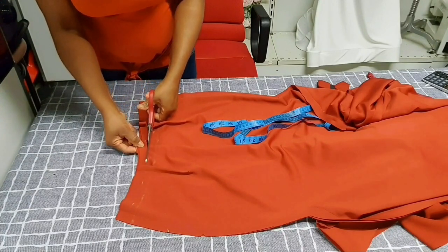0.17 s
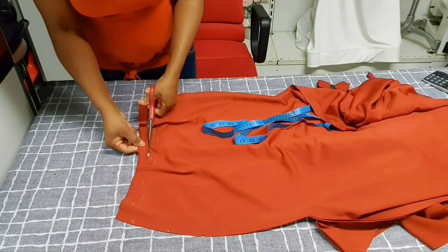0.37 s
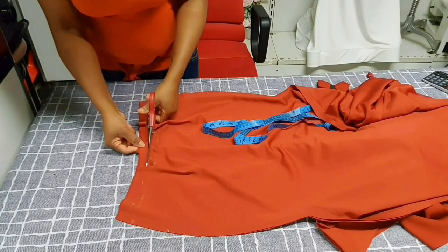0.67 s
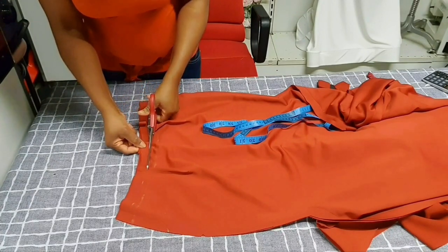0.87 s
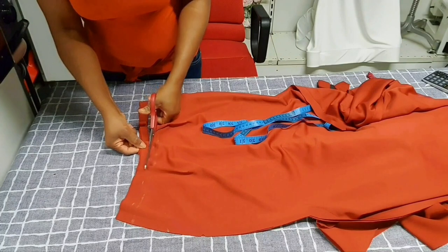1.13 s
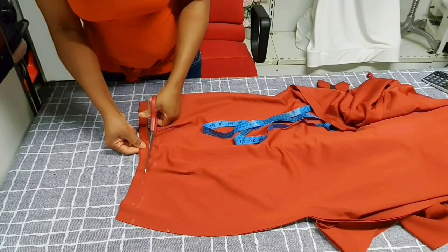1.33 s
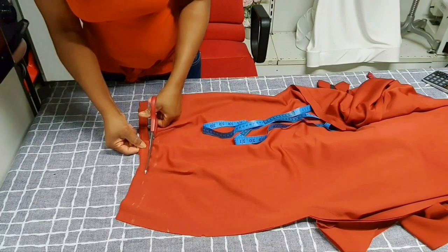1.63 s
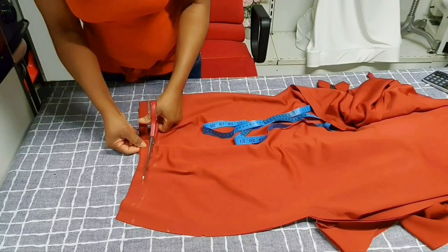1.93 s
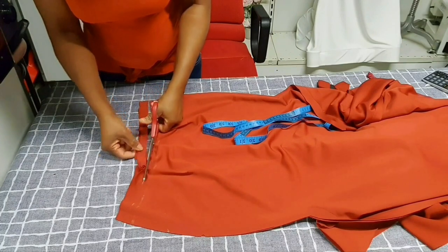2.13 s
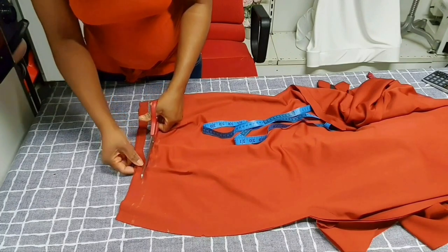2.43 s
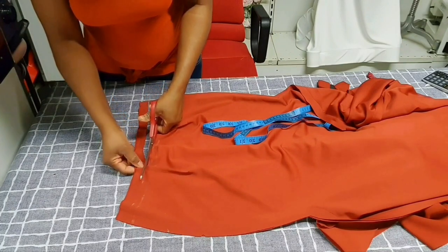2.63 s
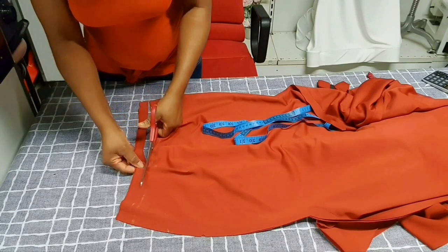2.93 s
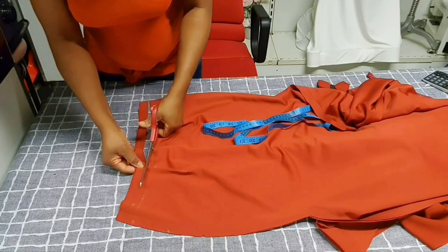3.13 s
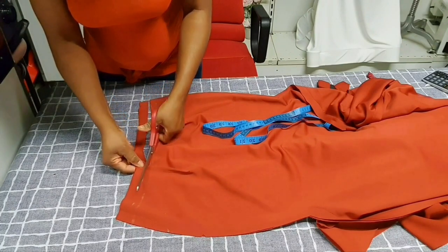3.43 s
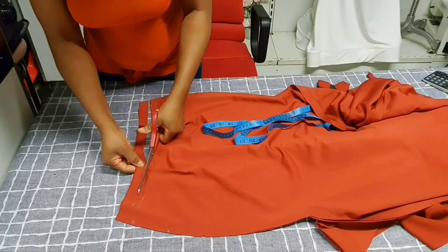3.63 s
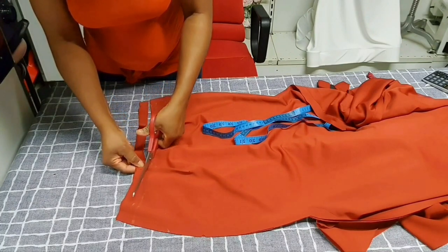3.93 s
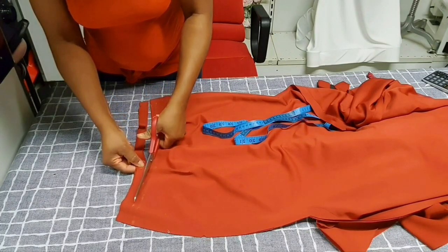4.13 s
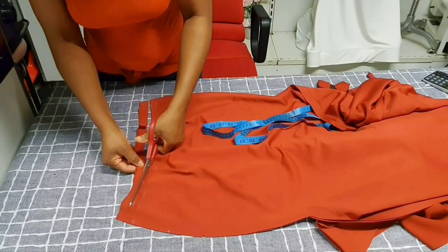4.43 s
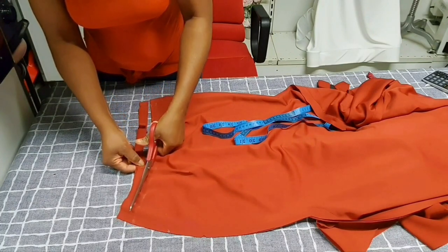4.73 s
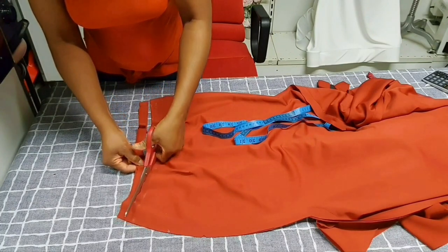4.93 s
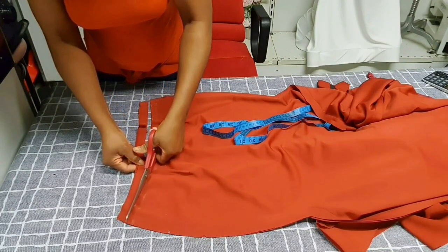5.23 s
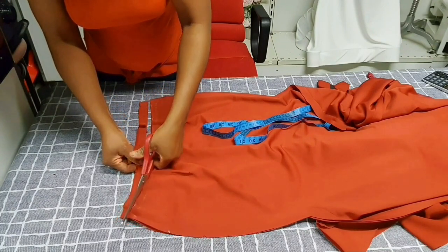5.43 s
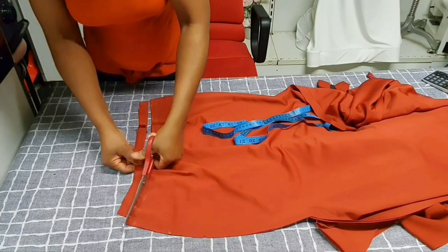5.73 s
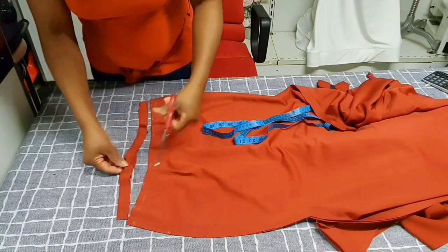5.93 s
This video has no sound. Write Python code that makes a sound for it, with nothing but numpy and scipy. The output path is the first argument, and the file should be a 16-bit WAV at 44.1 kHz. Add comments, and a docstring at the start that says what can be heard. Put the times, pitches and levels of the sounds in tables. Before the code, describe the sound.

Close by, slightly left, scissors trim cloth on a covered table. Nine short crunchy snips come about a second apart at first, then every half second, growing fuller. Each brings a dull table knock and often a small bright steel tick. Cloth swishes softly between early cuts, and blades rub dully as they reopen. Small quiet room with a faint low hum that sinks and fades.

```python
"""Tailor's scissors at a cloth-covered table

Scissors trim a strip from a dress in a small room. In each snip the lower blade settles on the table,
the blades bite, and parting threads, as uneven stick-slip impulses, shake the table and the steel.
Between snips the blades open and slide on, and the cloth swishes as shaped noise.
Knocks ring the table's modes, and steel ticks are short bright bursts of noise.
Behind lie quiet air and a faint, wavering low sine hum that sinks in pitch and fades to a fainter level."""
import sys
import numpy as np
from scipy import signal
from scipy.fft import rfft, irfft
from scipy.io import wavfile
from scipy.ndimage import uniform_filter1d

SR = 44100
rng = np.random.default_rng(int(sys.argv[2]) if len(sys.argv) > 2 else 0)


def dump_mix(stems):
    """Bounce the given channels to the path in sys.argv[1] as a 16-bit WAV at rate SR."""
    frames = np.atleast_2d(stems).T  # one column per channel
    limited = np.clip(frames, -1, 1)  # hard clip at full scale
    pcm = np.round(limited * 32767).astype(np.int16)
    wavfile.write(sys.argv[1], SR, pcm)


N = 268569
T = np.arange(N) / SR  # seconds

# All levels in the tables are relative, ahead of the trims in the functions.
# The snips. Each row: bite in seconds, length in seconds, landing ahead of the bite in seconds,
# landing level in dB, push on the table in dB, crunch of threads in dB, shear of the blades in dB,
# rasp of the edges in dB, fizz of fibres in dB, growth of the grip over the stroke in dB.
SNIPS = [(0.379, 0.0785, 0.036, -63, -47.5, -45.5, -46.5, -65, -67.5, 12.5),
         (1.383, 0.0759, 0.0315, -50, -44.5, -51.5, -60, -76.5, -74.5, 17),
         (1.981, 0.11415, 0.0151, -49, -37.5, -40.5, -54.5, -61.5, -68, -6),
         (2.526, 0.0907, 0.0248, -44, -49.5, -45.5, -50.5, -70.5, -64.5, 9.5),
         (3.522, 0.0801, 0.045, -43, -50.5, -44, -46.5, -65.5, -66, 6),
         (4.094, 0.0659, 0.0485, -46.5, -46.5, -42, -46, -57.5, -64, 5.5),
         (4.633, 0.1416, 0.0086, -72, -35, -38.5, -52.5, -54.5, -71, 2),
         (5.149, 0.1055, 0.033, -42, -34, -34.5, -51.5, -53, -68, 1.5),
         (5.676, 0.0906, .034, -53.5, -35.5, -37, -50.5, -50.5, -67.5, 3)]
# The blades open. Each row: start in seconds, length in seconds, rub on the table in dB,
# rub in the pivot in dB.
OPENINGS = [(2.265, 0.059, -54.5, -68), (3.231, 0.0916, -59.5, -79.5), (3.817, 0.0802, -58.5, -65.5),
            (4.424, 0.0285, -55, -56.5), (4.885, 0.1013, -58, -59.5), (5.379, 0.0978, -59.5, -61.5),
            (5.928, 0.0853, -59.5, -61.5)]
# The scissors knock on the table. Each row: time in seconds, strength in dB,
# hardness as a top cut-off in Hz, lightness as a bottom cut-off in Hz.
KNOCKS = [(.096, -27.5, 374, 163), (.125, -38, 669, 280), (.469, -18, 1466, 130), (.476, -24.5, 1175, 548),
          (.648, -28, 385, 152), (0.677, -34.5, 600, 139), (1.134, -50, 658, 400), (1.433, -30, 711, 198),
          (1.486, -20, 1418, 70), (1.746, -35, 678, 130), (2.014, -27.5, 850, 275), (2.047, -21, 860, 263),
          (2.53, -35, 850.7, 454), (2.593, -25.5, 930, 550), (2.617, -21, 814, 224), (2.645, -30, 195, 50),
          (2.951, -27.5, 371.7, 93), (2.976, -40.5, 600.3, 248), (3.586, -16.5, 1836, 85),
          (3.843, -37.5, 611, 298), (4.175, -26, 940, 117), (4.41, -40.5, 315, 109), (4.644, -25, 900, 330),
          (4.678, -21, 799.2, 400), (4.752, -22, 1123, 242), (5.202, -23, 301, 90), (5.231, -17, 950, 403),
          (5.721, -23, 508, 80.3), (5.735, -22.5, 643, 447), (5.757, -26.5, 976, 97)]
# Steel ticks on steel. Each row: time in seconds, level in dB.
TICKS = [(0.0941, -51), (0.4295, -61), (.47, -48), (.648, -63), (0.6785, -60.5), (1.364, -66),
         (1.4315, -62), (1.484, -47), (1.746, -49), (2.5907, -47.5), (2.6182, -45.5), (2.8529, -72.5),
         (3.5848, -51), (4.172, -46.5), (4.7533, -46.5), (5.263, -40.5), (5.72, -58), (5.7553, -42)]
# The cloth is drawn along. Each row: time of the height in seconds, swelling in seconds,
# fading in seconds, brushing level in dB, silky hiss in dB.
SWISHES = [(1.03, 0.0837, 0.114, -59.5, -67.5), (1.193, 0.1243, 0.147, -57, -65.5),
           (1.85, 0.31, 0.45, -78.5, -79.5), (2.83, 0.313, 0.176, -78, -69),
           (2.882, 0.0795, 0.055, -88.5, -56), (2.965, 0.108, 0.118, -67, -73.5),
           (3.08, .08, .12, -92.5, -80.5), (3.644, .06, 0.0935, -50, -76)]

# Ringing modes of the table top. Each row: pitch in Hz, level in dB, decay by 60 dB in seconds.
TABLE_MODES = [(90.9, -13.5, 0.42), (130.01, 5, 0.2593), (166.57, -1.5, 0.17), (191.9, -15, 0.27),
               (264.47, 2.5, 0.2073), (292.1, 0.5, 0.14), (341.2, -3.5, 0.089), (379.96, -8.5, 0.13),
               (478.36, -11, 0.1), (522.77, -6, 0.1116), (612.74, -14.5, 0.075), (748.6, -7.5, 0.131),
               (856.4, -14, 0.034), (865.7, -13.5, 0.14), (952.7, -14.5, 0.063), (1026.2, -7.5, 0.1893),
               (1065.6, -9.5, 0.071), (1246, -12, 0.052), (1285, -22, 0.11), (1329.2, -10, 0.065),
               (1428, -18.5, 0.083), (1533, -29, 0.068), (1853, -24.5, 0.17), (2262, -19, .11),
               (2650, -20.5, .1), (3430, -18, 0.11)]
# Pitches at which the table's modes cancel. Each row: pitch in Hz, width in Hz.
DEAD_PITCHES = [(228, 41), (408, 52), (555, 46), (678, 60)]
# Modes of the steel blades. Each row: pitch in Hz, width in Hz, level in dB.
BLADE_MODES = [(2093, 180, -1.5), (3255.3, 67, 5.5), (4255, 1100, -3.5)]

# Colours of the sounds. Each row: frequency in Hz, level in dB.
THUD_COLOUR = [(30, -52.5), (55, -22.5), (85, -2.5), (160, 2.5), (330, -2.5), (480, -2), (1000, -6),
               (1700, -15.5), (3000, -23), (4500, -43), (15000, -47.5)]  # dead thud of the table
CLACK_COLOUR = [(60, -19), (130, 6), (300, 6.5), (520, -15.5), (1050, 0), (1600, -7), (2300, 3.5),
                (3300, -10.5), (6000, -23)]  # straight from the point of contact
PUSH_COLOUR = [(25, -43.5), (55, -11.5), (85, -3.5), (130, -11.5), (175, 5), (270, 0.5), (360, -6.5),
               (480, -14.5), (1000, -37)]  # pressure on the table
CRUNCH_COLOUR = [(150, -28.5), (330, -9.5), (470, 3), (750, -4), (1000, -4.5), (1350, -6.5), (2200, -10),
                 (3500, -17), (8000, -19)]  # parting threads
SHEAR_COLOUR = [(600, -1.5), (1400, 1), (2200, -6.5), (2800, -1.5), (3350, 4.5), (3900, 1), (4600, -12.5),
                (6000, -13.5), (9000, -28), (15500, -40)]  # blade on blade
RASP_COLOUR = [(2500, -24), (4400, 0), (5400, 7), (6700, 3), (7700, 5.5), (8600, -16.5), (9500, -29.5),
               (15600, -15.5)]  # cutting edges
FIZZ_COLOUR = [(3000, -40.5), (8000, -4), (9500, -12.5), (10400, -5), (10900, -3.5), (11800, 6.5),
               (12800, -7.5), (13800, 1.5), (15600, -6)]  # fine fibres
SLIDE_COLOUR = [(25, -13.5), (50, 2.5), (90, -6.5), (128, -9.5), (165, 5.5), (270, 2), (360, -7),
                (480, -20.5), (1000, -48)]  # rub along the table
PIVOT_COLOUR = [(200, -38.5), (380, -4), (490, 5.5), (620, -3.5), (780, -5.5), (1050, -20.5), (1500, -21),
                (4000, -42)]  # rub in the pivot
CHATTER_COLOUR = [(300, -16.5), (600, 4), (680, 4), (770, -2), (1030, 10), (1330, -2), (1550, -10),
                  (2300, -12), (2900, -18.5), (3400, -25), (4000, -37), (9000, -50)]  # steel after a knock
TICK_COLOUR = [(500, -10.5), (2000, 8), (4000, -2), (6500, 4.5), (8000, 5.5), (9500, -21), (12000, -4),
               (15500, -13.5)]  # steel on steel
BRUSH_COLOUR = [(500, -4.5), (1600, -10.5), (2900, 5), (4200, -3.5), (6000, -6), (12000, -24.5)]  # body of the swish
SILK_COLOUR = [(2500, -23.5), (5000, -4), (6200, 1.5), (7800, 2), (9300, -27), (12500, -12.5),
               (15500, -29.5)]  # hiss of the cloth
AIR_COLOUR = [(20, -19), (45, -9), (70, -3), (120, -2), (150, -6), (230, -9), (268, -3), (330, -16),
              (500, -17), (750, -21), (1050, -23), (1500, -27), (2800, -25), (4500, -29), (7900, -32),
              (9400, -42), (15500, -37)]  # room air

# Decay of the room. Each row: frequency in Hz, decay by 60 dB in seconds.
ROOM_DECAY = [(100, 0.21), (300, 0.38), (1000, 0.25), (1700, 0.375), (3000, 0.18), (6000, 0.14),
              (14000, 0.049)]
# Colour of the room's tail. Each row: frequency in Hz, level in dB.
ROOM_COLOUR = [(100, -21), (300, -21), (700, -7), (1500, -3.5), (5000, -1), (14000, 0)]
# Likeness of left and right in diffuse sound. Each row: frequency in Hz, likeness from 0 to 1.
LIKENESS = [(30, .93), (70, .995), (160, .995), (300, .95), (600, .7), (1200, .3), (2500, 0), (15000, 0)]
# First echoes off the table and nearby walls. Each row: delay to the left in seconds,
# delay to the right in seconds, level in dB.
ECHOES = [(.0007, 0.000782, -3.5), (.0019, 0.0014, -16.5), (.0032, .0036, -7), (.0058, 0.0075, -3),
          (.0081, 0.014, -16.5)]

# How each part follows the stroke. Each row: attack in seconds, release in seconds,
# growth over the stroke in dB (the grip adds to it in a snip), bulge at mid-stroke in dB.
SETTLE_SHAPE = (.02, .06, 0.14, 0.5)
PUSH_SHAPE = (0.0666, 0.2435, -6.5, 6.5)
CRUNCH_SHAPE = (.06, .065, 1.5, 4)
SHEAR_SHAPE = (.04, .05, 0, 0.76)
RASP_SHAPE = (.042, 0.071, 5, 6.8)
FIZZ_SHAPE = (0.0478, 0.0839, -5.5, -2)
SLIDE_SHAPE = (0.071, 0.106, 2.2, 1.5)  # hardest as the blades slide on
PIVOT_SHAPE = (0.0529, 0.0062, -8.5, 5)  # hardest as the blades start to part
SKIRT_DB = 40  # an attack or a release spans this much

SETTLE_S, SETTLE_CRUNCH_DB = 0.0207, -12.5
# The rasp's resonance climbs as the crossing point of the edges runs toward the tips.
RASP_FROM_HZ, RASP_TO_HZ = 5650, 6256
CUSHION_S = .0004  # the cloth softens the table's onset
CLACK_DB = 11
# The harder the blow, the more the steel chatters: level at 1 kHz hardness, and its rise.
CHATTER_DB, CHATTER_DB_PER_OCTAVE = -20, 14.5
HUM_HZ, HUM_LOWEST_HZ, HUM_SAG_HZ_PER_S, HUM_SAG_FROM_S = 117.8, 95.5, 5.9, 0.72
# Hum levels ahead of its swell and waver.
HUM_DB, HUM_FAINTEST_DB, HUM_FADE_DB_PER_S, HUM_FADE_FROM_S = -65.5, -80.5, 4, 2.1
HUM_SWELL_S, HUM_SWELL_WIDTH_S, HUM_SWELL_DB = 1.3, 0.3, 8
AIR_DB = -70
EDGE_HZ = 15750  # top of the band


def snips(top):
    """Threads part between the blades: jolts ring the table and the steel, edges rasp, fibres fizz."""
    settle = settling()
    scrape = shear() + rasp() + fizz()
    return push(top, settle) + shifting(crunch(top, settle), patchy_db=2.5) + shifting(scrape)


def settling():
    """Gain of the lower blade landing and settling on the table just before each bite."""
    return sum(stroke(bite_s - lead_s, SETTLE_S, db, SETTLE_SHAPE)
               for bite_s, _, lead_s, db, *_ in SNIPS)


def push(top, settle):
    """Stick-slip under the pressing blade drives the low modes of the table."""
    jolts = slips(per_s=260, spread_db=1.0, clump_db=-1.37)
    pressure = settle + closing(PUSH_SHAPE, column=4)
    return amp(-1.5) * ring(jolts * pressure, top, colour(PUSH_COLOUR))


def crunch(top, settle, catch_db=2.0):
    """Threads give way in uneven catches, and each jolt shakes the table."""
    catches = amp(catch_db * evened(signal.resample(rng.standard_normal(size=400), N)))
    cutting = amp(SETTLE_CRUNCH_DB) * settle + catches * closing(CRUNCH_SHAPE, column=5)
    jolts = slips(per_s=360, spread_db=3.5, clump_db=2.5)
    return amp(-3.0) * ring(jolts * cutting, top, colour(CRUNCH_COLOUR))


def shear(steel_db=-3):
    """Dense stick-slip between the blades is heard directly and through the steel's modes."""
    threads = slips(per_s=1100, spread_db=4.5, clump_db=1.5)
    steel = sum(amp(db) * evened(resonate(threads, hz, width_hz)) for hz, width_hz, db in BLADE_MODES)
    scrape = ring(threads, colour(SHEAR_COLOUR)) + amp(steel_db) * evened(steel)
    return amp(-5.0) * scrape * closing(SHEAR_SHAPE, column=6)


def rasp(edge_db=-3):
    """Fine grit excites the cutting edges, whose resonance climbs over each snip."""
    grit = slips(per_s=1600, spread_db=4.0, clump_db=4.5)
    bite_and_end_s = np.ravel([(bite_s, bite_s + length_s) for bite_s, length_s, *_ in SNIPS])
    edge_hz = np.interp(T, bite_and_end_s, [RASP_FROM_HZ, RASP_TO_HZ] * len(SNIPS))
    edge = evened(resonate(grit, edge_hz, width_hz=2420))
    scrape = evened(ring(grit + amp(edge_db) * edge, colour(RASP_COLOUR)))
    return amp(-1.0) * scrape * closing(RASP_SHAPE, column=7)


def fizz():
    """Very dense tiny impulses of breaking fibres give a bright fizz."""
    fibres = slips(per_s=3100, spread_db=6.5, clump_db=4.5)
    return amp(-1.0) * ring(fibres * closing(FIZZ_SHAPE, column=8), colour(FIZZ_COLOUR))


def openings(top, silk_db=-24):
    """The blades part and slide forward, rubbing dully on the table and faintly along the cloth."""
    weight = sum(stroke(s, length_s, db, SLIDE_SHAPE) for s, length_s, db, _ in OPENINGS)
    effort = sum(stroke(s, length_s, db, PIVOT_SHAPE) for s, length_s, _, db in OPENINGS)
    table_rub = slips(per_s=870, spread_db=-2, clump_db=1.5) * weight
    pivot_rub = slips(per_s=180, spread_db=5, clump_db=3.0) * effort
    slide = amp(3.5) * ring(table_rub, top, colour(SLIDE_COLOUR))
    pivot = amp(5.5) * ring(pivot_rub, top, colour(PIVOT_COLOUR))
    silk = amp(silk_db) * ring(rng.standard_normal(N) * effort, colour(SILK_COLOUR))
    return slide + pivot + silk


def knocks(top, chatter_s=0.01317):
    """A clack, then the table rings and steel chatters; soft blows lack highs, light ones lows."""
    thuds, bounces = np.zeros((2, N))
    t = np.arange(SR // 8) / SR
    struck = top.copy()
    add(struck, 0, amp(CLACK_DB) * colour(CLACK_COLOUR))
    for s, db, hard_hz, light_hz in KNOCKS:
        blow = signal.lfilter(*signal.butter(3, min(hard_hz, SR / 4), fs=SR), struck)
        blow = signal.lfilter(*signal.butter(2, light_hz, "high", fs=SR), blow)
        add(thuds, s, amp(db) * blow)
        octaves = np.log2(hard_hz / 1000)
        chatter_db = db + CHATTER_DB + CHATTER_DB_PER_OCTAVE * octaves
        add(bounces, s, amp(chatter_db) * np.exp(-t / chatter_s))
    contacts = slips(per_s=1200, spread_db=-2.0, clump_db=-2.63)
    return thuds + ring(bounces * contacts, colour(CHATTER_COLOUR))


def ticks(decay_s=0.0037, rise_s=0.00028, level_db=-1):
    """Each touch of steel on steel is a burst of bright contact noise a few milliseconds long."""
    bursts = np.zeros(N)
    t = np.arange(SR // 25) / SR
    envelope = (1 - np.exp(-t / rise_s)) * np.exp(-t / decay_s)
    for s, db in TICKS:
        add(bursts, s, amp(db + level_db) * envelope * rng.standard_normal(len(t)))
    return ring(bursts, colour(TICK_COLOUR))


def swishes(roundness=1.184):
    """Countless fibres brush past each other as the cloth is drawn along; each move swells and fades."""
    brushing, hissing = np.zeros((2, N))
    for s, swell_s, fade_s, brush_db, silk_db in SWISHES:
        away = np.clip(np.maximum((s - T) / swell_s, (T - s) / fade_s), 0, 10)
        speed = amp(-SKIRT_DB * away ** roundness)
        brushing += amp(brush_db) * speed
        hissing += amp(silk_db) * speed
    brush = amp(-6) * ring(rng.standard_normal(N) * brushing, colour(BRUSH_COLOUR))
    silk = amp(-1.5) * ring(rng.standard_normal(N) * hissing, colour(SILK_COLOUR))
    return shifting(brush + silk, patchy_db=4.5)


def table_top(thud_db=-6):
    """The table's answer to an impulse: a dead thud and ringing modes, cushioned by the cloth."""
    t = np.arange(SR // 2) / SR
    top = np.zeros(len(t))
    for k, (hz, db, t60) in enumerate(TABLE_MODES):
        top += (-1) ** k * amp(db - 60 * t / t60) * np.sin(2 * np.pi * hz * t)
    add(top, 0, amp(thud_db) * np.linalg.norm(top) * colour(THUD_COLOUR))
    top = top * (1 - np.exp(-t / CUSHION_S))
    for hz, width_hz in DEAD_PITCHES:
        top = signal.lfilter(*signal.iirnotch(hz, hz / width_hz, fs=SR), top)
    return top / abs(top).max()


def first_echoes(x, above_hz=1200):
    """Small hard surfaces nearby throw back only the treble, which combs its colour."""
    treble = signal.lfilter(*signal.butter(2, above_hz, "high", fs=SR), x)
    out = np.zeros((2, N))
    for left_s, right_s, db in ECHOES:
        add(out[0], left_s, amp(db) * treble)
        add(out[1], right_s, amp(db) * treble)
    return out


def room(x, lead_s=0.000217, first_echo_s=.004):
    """The scissors lie to the left, so that side hears them first; a short diffuse tail follows."""
    hz, t, z = signal.stft(noise_pair(SR // 2), SR, nperseg=256)
    t60 = np.maximum(read(ROOM_DECAY, hz), .02)[:, None]
    # longer decays start lower, so the colour alone sets each band's energy
    fade = np.sqrt(np.log(10 ** 6) / (t60 * SR)) * amp(-60 * t / t60)
    tail = signal.istft(z * fade * amp(read(ROOM_COLOUR, hz))[:, None], SR, nperseg=256)[1]
    tail = np.pad(tail, ((0, 0), (round(first_echo_s * SR), 0)))
    delay = np.exp(-2j * np.pi * np.fft.rfftfreq(N, 1 / SR) * lead_s)
    right = irfft(rfft(x) * delay, N)
    return np.array([x, right]) + signal.oaconvolve(x[None], tail, axes=1)[:, :N]


def hum(waver_db=1.0):
    """A wavering low sine sinks slowly in pitch; it swells once on the way, then fades to a fainter level."""
    hz = np.clip(HUM_HZ - HUM_SAG_HZ_PER_S * (T - HUM_SAG_FROM_S), HUM_LOWEST_HZ, HUM_HZ)
    db = np.clip(HUM_DB - HUM_FADE_DB_PER_S * (T - HUM_FADE_FROM_S), HUM_FAINTEST_DB, HUM_DB)
    swell = HUM_SWELL_DB * np.exp(-((T - HUM_SWELL_S) / HUM_SWELL_WIDTH_S) ** 2)
    waver = waver_db * evened(signal.resample(rng.standard_normal(size=90), N))
    return np.sqrt(2) * amp(db + swell + waver) * np.sin(2 * np.pi * np.cumsum(hz) / SR)


def air():
    """Quiet room air: steady coloured noise, alike on both sides only in the bass."""
    gain = amp(read(AIR_COLOUR, np.fft.rfftfreq(N, 1 / SR)))
    return amp(AIR_DB) * evened(irfft(rfft(noise_pair(N)) * gain, N))


def stroke(start, length, db, shape):
    """Gain of one stroke over time: attack, a hold that grows and bulges, release."""
    attack_s, release_s, growth_db, bulge_db = shape
    done = np.clip((T - start) / length, 0, 1)
    outside = np.maximum(start - T, 0) / attack_s + np.maximum(T - start - length, 0) / release_s
    hold_db = growth_db * (done - .5) + bulge_db * (np.sin(np.pi * done) - 1)
    return amp(db + hold_db - SKIRT_DB * np.minimum(outside, 10))


def closing(shape, column):
    """Gain of one part through all the snips, from its level column; the grip adds to its growth."""
    attack_s, release_s, growth_db, bulge_db = shape
    return sum(stroke(row[0], row[1], row[column], (attack_s, release_s, growth_db + row[-1], bulge_db))
               for row in SNIPS)


def slips(per_s, spread_db, clump_db):
    """Tiny stick-slip impulses of uneven spacing and size, bunched in clumps; rms one."""
    gaps = rng.gamma(2, .5, int(per_s * N / SR * 2)) * SR / per_s
    at = np.cumsum(gaps).astype(int)
    at = at[at < N]
    sizes = amp(spread_db * np.minimum(rng.exponential(1, len(at)), 3))
    train = np.zeros(N)
    train[at] = rng.choice([-1, 1], len(at)) * sizes
    clumps = evened(uniform_filter1d(rng.standard_normal(N), size=350))
    return evened(train * amp(clump_db * np.clip(clumps, -2, 2)))


def shifting(x, patchy_db=6.0):
    """Narrow bands swell and fade at random, as when the crossing point runs along the blades."""
    z = signal.stft(x, SR, nperseg=512, noverlap=384)[2]
    patches = uniform_filter1d(rng.standard_normal(z.shape), size=3, axis=0)  # across frequency
    patches = evened(uniform_filter1d(patches, size=20, axis=1))  # across time
    gain = evened(amp(patchy_db * np.clip(patches, -2, 2)))
    return signal.istft(z * gain, SR, nperseg=512, noverlap=384)[1][:N]


def resonate(x, hz, width_hz):
    """A resonance of gain one that can follow a curve: shift down to zero, smooth, shift back."""
    turn = np.exp(2j * np.pi * np.cumsum(hz * np.ones(N)) / SR)
    r = np.exp(-np.pi * width_hz / SR)
    return 2 * (turn * signal.lfilter([1 - r], [1, -r], x / turn)).real


def ring(drive, *bodies):
    """Passes a drive through a chain of bodies, scaled to unit energy as a whole."""
    response = np.ones(1)
    for body in bodies:
        response = signal.fftconvolve(response, body)
    return signal.oaconvolve(drive, response / np.linalg.norm(response))[:N]


def colour(points, size=4096):
    """Causal (minimum-phase) click of unit energy with the given spectrum."""
    log_gain = np.log(amp(read(points, abs(np.fft.fftfreq(size, 1 / SR)))))
    click = np.fft.ifft(np.exp(np.conj(signal.hilbert(log_gain)))).real[:size // 2]
    return click / np.linalg.norm(click)


def noise_pair(size):
    """Diffuse noise as heard at two close points: alike in the bass only."""
    a, b = rfft(rng.standard_normal((2, size)))
    same = np.clip(read(LIKENESS, np.fft.rfftfreq(size, 1 / SR)), 0, 1)
    mid = a * np.sqrt((1 + same) / 2)
    side = b * np.sqrt((1 - same) / 2)
    return irfft(np.array([mid + side, mid - side]), size)


def amp(db):
    """Decibels to gain."""
    return 10 ** (np.asarray(db) / 20)


def evened(x):
    """Scales to an rms of one."""
    return x / np.sqrt(np.mean(x ** 2) + 1e-20)


def read(points, hz):
    """Reads a table on a log-frequency axis."""
    f, value = np.transpose(points)
    return np.interp(np.log(hz + 1), np.log(f + 1), value)


def add(mix, s, sound):
    """Mixes a sound in at time s, in seconds."""
    part = mix[max(round(s * SR), 0):][:len(sound)]
    part += sound[:len(part)]


def scene():
    """All the work of the scissors, heard in the room over the hum and air."""
    top = table_top()
    work = snips(top) + openings(top) + knocks(top) + ticks() + swishes()
    return room(work) + first_echoes(work) + hum() + air()


def record(dry):
    """A steep linear-phase low-pass limits the band."""
    low_pass = signal.firwin(511, EDGE_HZ, window=("kaiser", 9), fs=SR)
    return signal.oaconvolve(dry, low_pass[None], "same")


dry = scene()
out = record(dry)
dump_mix(out)
```